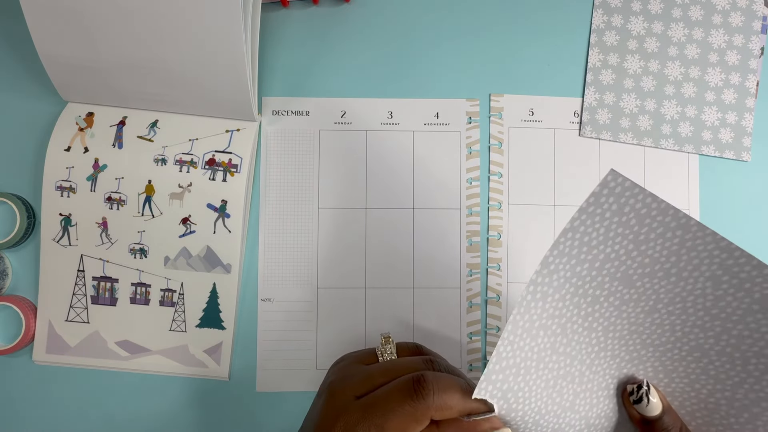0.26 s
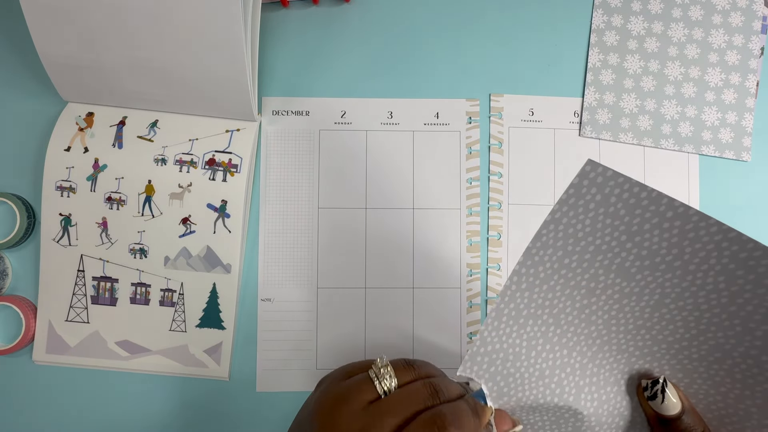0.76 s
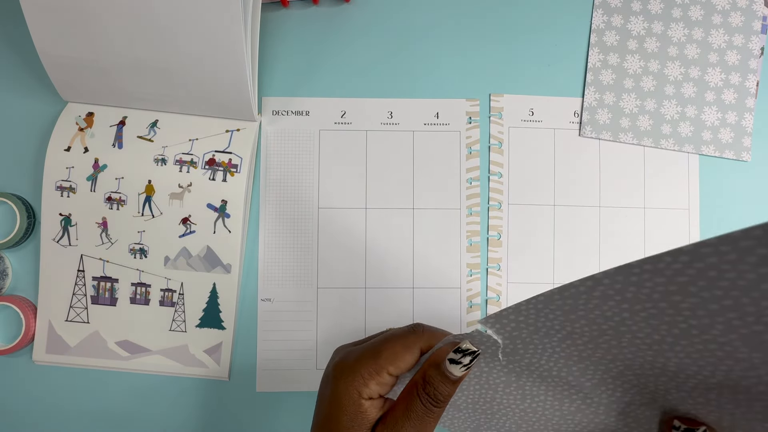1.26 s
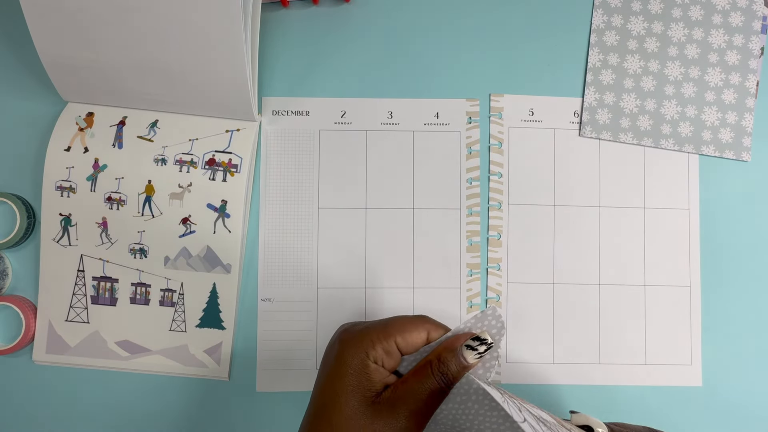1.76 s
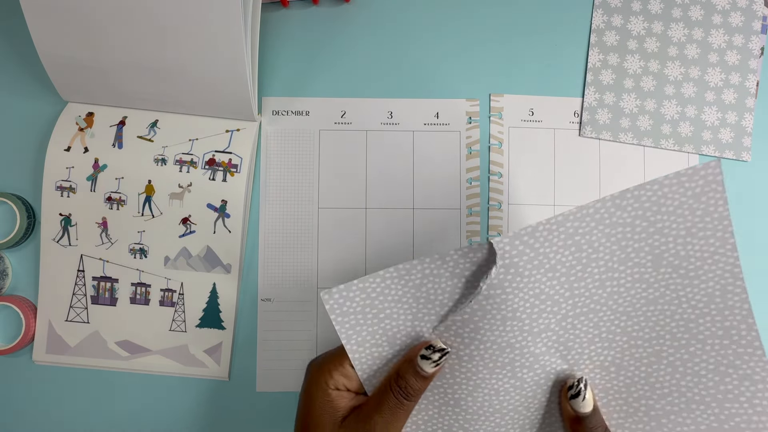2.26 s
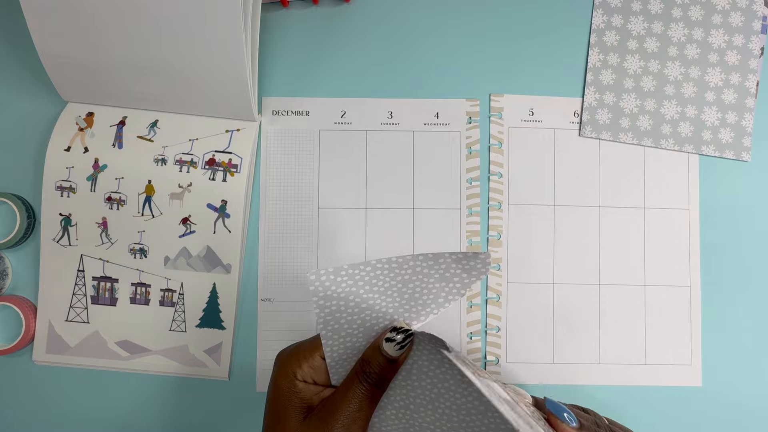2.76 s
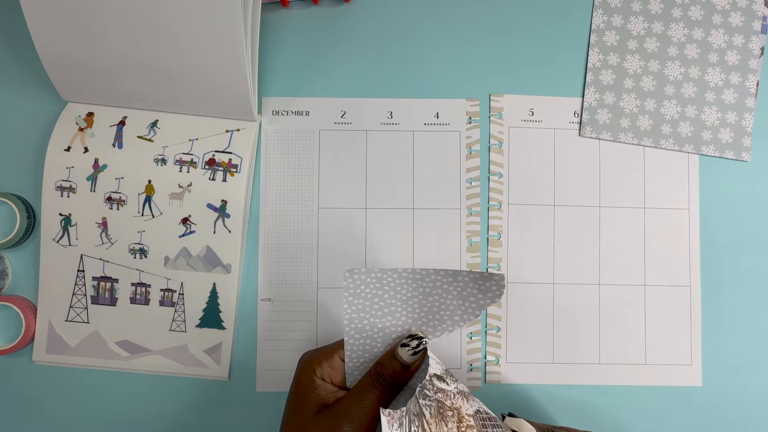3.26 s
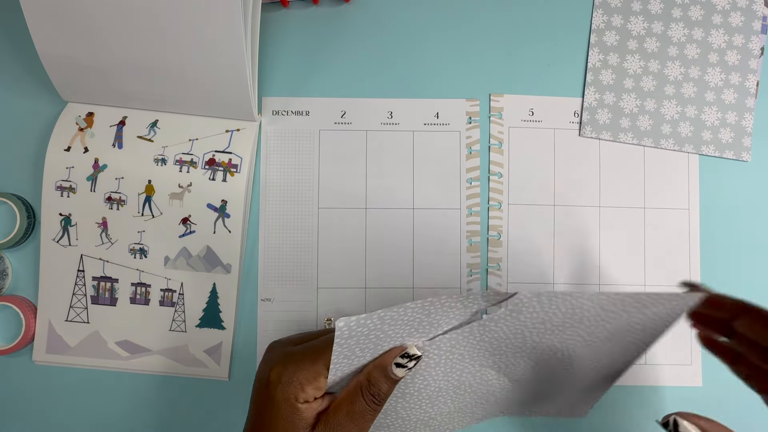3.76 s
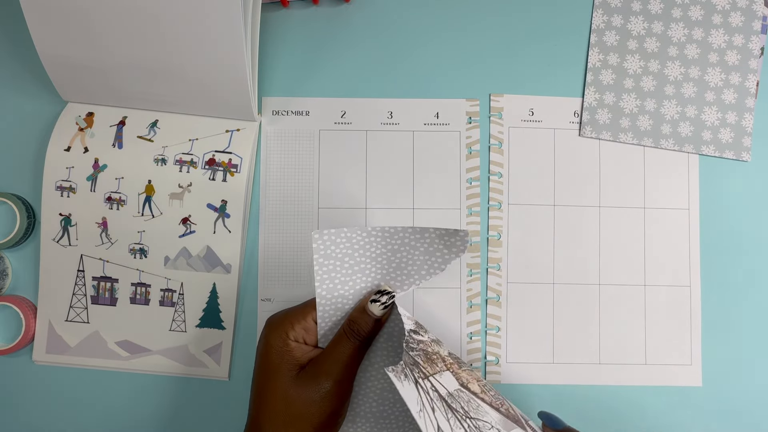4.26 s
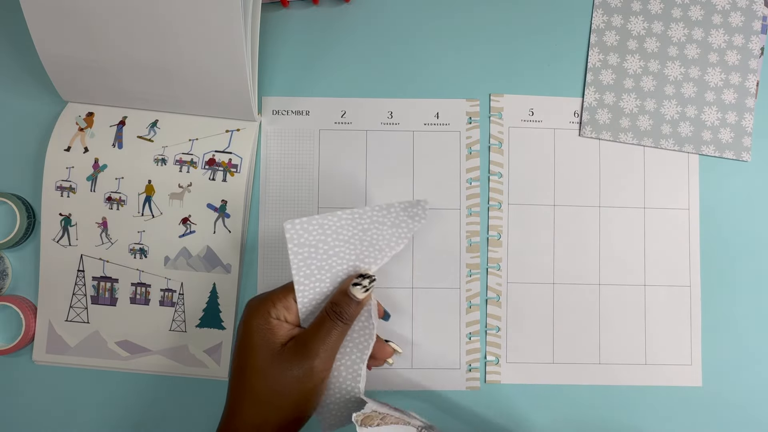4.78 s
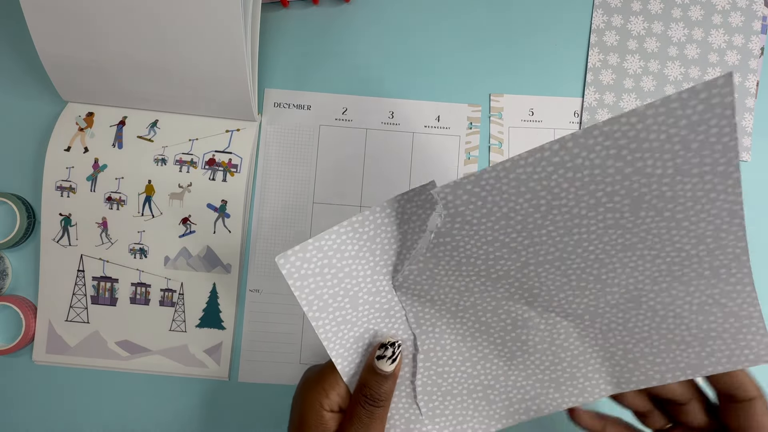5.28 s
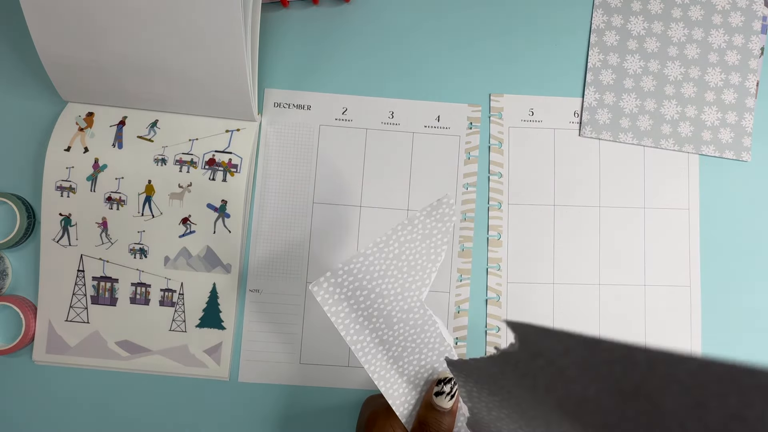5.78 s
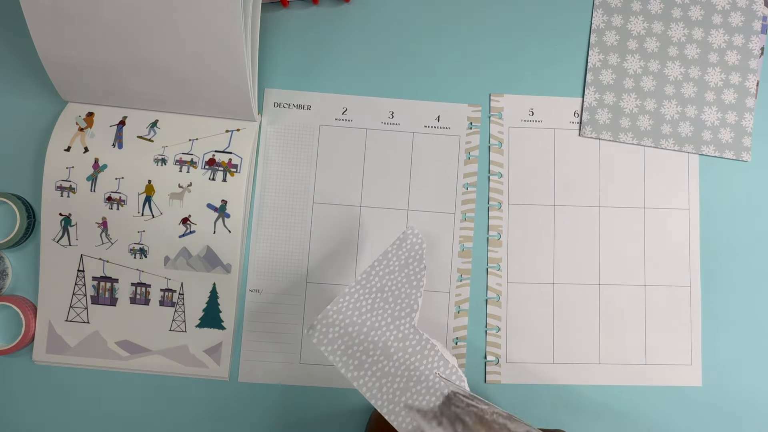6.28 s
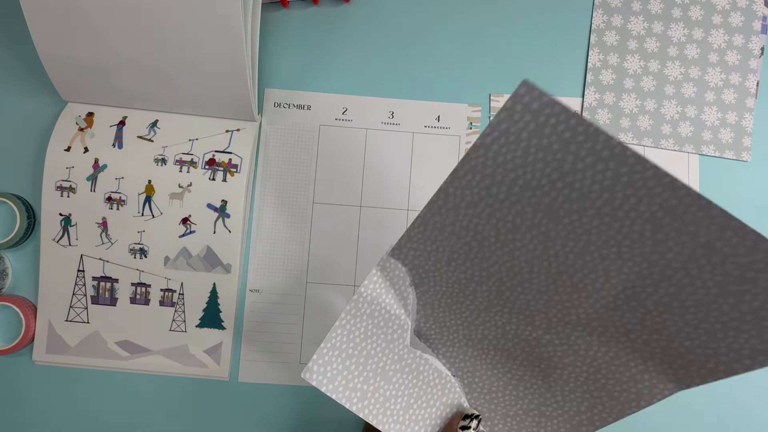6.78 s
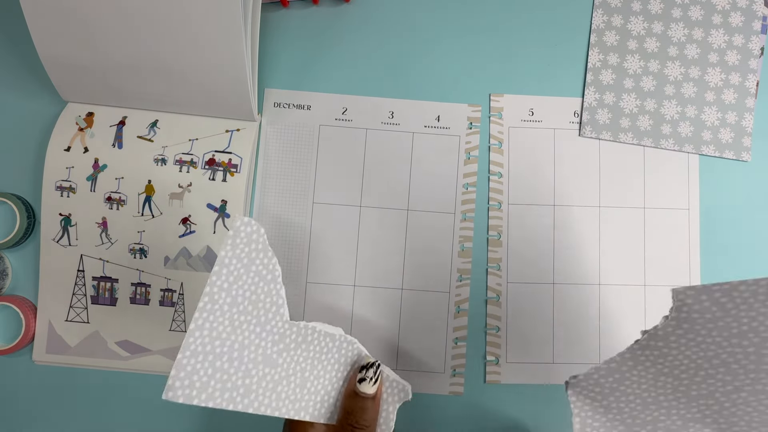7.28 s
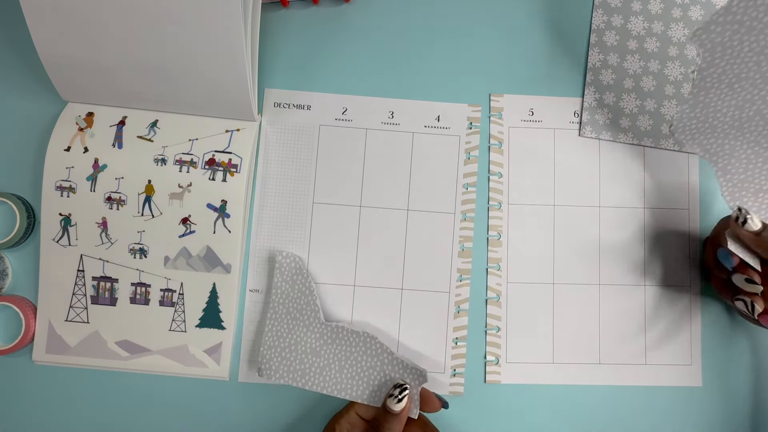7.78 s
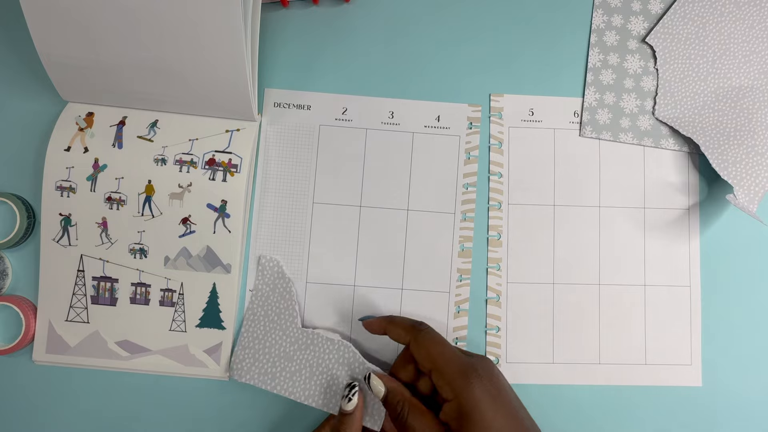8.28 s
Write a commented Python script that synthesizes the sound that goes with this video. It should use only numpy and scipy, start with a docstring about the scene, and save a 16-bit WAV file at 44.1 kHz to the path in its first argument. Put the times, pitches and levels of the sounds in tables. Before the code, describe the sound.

A stiff sheet rustles, flexes and rips in short, jerky bursts, close to a pair of microphones in a small quiet room. Lively crackling comes first, then a brief pause, a rising run of tears and hollow panel pops at their loudest, and gentler sliding and creaking. A single bright snap precedes sparse small ticks. Low puffs of moved air and a faint hum sit underneath.

```python
"""A sheet of thick paper is torn and turned by hand over a desk, under a pair of close microphones.
It starts with busy crackle, rustle and crease snaps, nearly stops after 2.6 s, and builds to the loudest
pops and tears between 3.9 and 4.8 s; softer moves and creaks follow, then one sharp snap at 7.15 s and
small ticks. Shaped noise makes fibres, rustle and pushed air; short ringing tones make pops and creaks.
A small room answers throughout, over a faint mains hum and ventilation rumble."""
import sys
import numpy as np
from scipy import signal
from scipy.fft import rfft, irfft, next_fast_len
from scipy.io import wavfile
from scipy.ndimage import uniform_filter1d, map_coordinates

SR = 44100
rng = np.random.default_rng(int(sys.argv[2]) if len(sys.argv) > 2 else 0)


def unload_audio(sound):
    """Save the sound as a 16-bit wav file, at the path given as the first command line argument."""
    columns = np.transpose(np.atleast_2d(sound))
    # keep every value between -1 and 1, then stretch to whole-number steps
    steps = np.round(np.clip(columns, -1, 1) * 32767)
    wavfile.write(sys.argv[1], SR, steps.astype(np.int16))


N = 376613
TOP_HZ = 16000  # the treble fades out above this

# colour of parting fibres: (frequency [Hz], relative level per Hz [dB])
FIBRE_COLOUR = [(710, -17), (1200, -9), (2420, -7), (2820, -7.5), (3120, -8.5), (4940, -7.5), (9030, -8.5),
                (11100, -12), (14900, -6.5), (16000, -17.5), (16500, -41.5)]


def sheet():
    """Fibres part and rub in a dense crackle while the whole sheet rustles; powers of overlapping moves add."""
    # the sheet held and turned, always a little alive:
    # (time [s], fibre hiss [dB], rustle [dB], left minus right [dB], treble sheen: bright minus dull [dB])
    handling = [(0, -59.5, -58, 1, -5), (.4, -64.5, -60.5, -1, -14.5), (.8, -58, -60.5, -1, -10),
                (1.2, -65, -68, -1, -12.5), (1.55, -53, -57, 4, -2), (2.1, -57.5, -61, -2, -6),
                (2.6, -67, -62, 2.5, -9), (2.68, -86, -78, 5.5, -17), (3.02, -78.5, -64.5, 1.5, -17.5),
                (3.5, -54, -55, 1, -5), (3.65, -67.5, -75, 2, -7), (4.25, -67, -59.5, 3.5, -8),
                (4.45, -69, -67.5, 2, -7), (5, -52, -59, 1, -7.5), (5.7, -59, -64.5, -1, 1.5),
                (6.25, -64.5, -70, 1.5, -10.5), (6.7, -58, -69, 1, 1), (6.95, -64.5, -82, -0.5, -7),
                (7.6, -66, -72.5, 1.5, -1), (8.1, -75.5, -80, 4, -4.5), (8.54, -62.5, -80, 5, 1)]
    # rips and slides: (start [s], length [s], fibre hiss [dB], rustle [dB], treble sheen [dB])
    strokes = [(0.074, 0.1, -61, -47.5, 8), (0.189, 0.071, -56.5, -51.5, -23), (0.251, 0.071, -51, -71, 0),
               (0.465, 0.071, -51, -67, 10), (0.59, 0.089, -48, -61, -5), (0.834, 0.12, -50, -79, 3),
               (1.01, 0.14, -61, -85, 8), (1.243, 0.067, -48.5, -49.5, -2), (1.597, 0.12, -45.5, -55, 14),
               (1.778, 0.08, -40, -36, -17), (1.93, 0.07, -44, -46, -7), (2.186, 0.074, -47, -44.5, -3),
               (2.281, 0.13, -50, -70, 5.5), (2.554, 0.067, -57.5, -55, -12),
               (2.859, 0.064, -63.5, -60.5, -5), (3.021, 0.14, -51.5, -49, -9.5),
               (3.18, 0.23, -50.5, -50, -7), (3.282, 0.13, -41, -58, 1), (3.481, 0.11, -52, -79, 5),
               (3.687, 0.096, -51, -53, -9), (3.874, 0.17, -60.5, -59, -25), (4.088, 0.041, -66, -52, -21),
               (4.19, 0.13, -60.5, -78, -1), (4.345, 0.022, -57, -77, 10), (4.457, 0.082, -35, -39, -9),
               (4.692, 0.06, -34.5, -43, -2), (4.734, 0.059, -21.5, -35, -4), (5.02, 0.2, -56.5, -59.5, 15),
               (5.277, 0.18, -59, -58.5, 3), (5.466, 0.12, -52, -63, 3), (5.774, 0.12, -42, -52, 0),
               (5.993, 0.077, -48, -57, -2.5), (6.096, 0.077, -52, -70, 4), (6.258, 0.044, -46.5, -69, 0),
               (6.312, 0.031, -61, -46, -13.5), (6.466, 0.087, -63.5, -78, 10),
               (6.615, 0.11, -51.5, -54, 1.5), (6.803, 0.048, -69, -59, -9), (6.963, 0.12, -48.5, -82, 8),
               (7.118, 0.03, -37, -63, 22), (7.318, 0.079, -52.5, -75, 5.5), (7.388, 0.085, -51, -70.5, 8),
               (7.483, 0.076, -57.5, -65.5, 15), (7.7, 0.17, -63.5, -79.5, 3),
               (7.967, 0.046, -59.5, -62.5, 3.5), (8.125, 0.073, -62, -69.5, 6),
               (8.267, .08, -62.5, -70.5, 4.5), (8.382, 0.085, -64.5, -79, 2.5)]
    # colour of the rustle: (frequency [Hz], relative level per Hz [dB])
    rustle_colour = [(120, -47), (200, 0), (420, 0), (491, 5), (574, -4.5), (647, 3), (1690, -6),
                     (2820, -12.5), (3500, -31.5), (4550, -37.5), (7700, -120)]

    hiss_db, rustle_db, pan_db, sheen_db = curves(handling)
    power = np.zeros((3, N + SR))  # dull hiss, bright hiss, rustle
    power[:, :N] = amp([hiss_db - sheen_db / 2, hiss_db + sheen_db / 2, rustle_db]) ** 2
    for start_s, length_s, hiss, body, sheen in strokes:
        at, shape = gesture(start_s, length_s, attack_s=0.04, release_s=0.0097)
        level = amp([[hiss - sheen / 2], [hiss + sheen / 2], [body]])
        power[:, at] += (level * shape) ** 2
    dull, bright, body = np.sqrt(power[:, :N])

    fibres = spread(crackle(clump_db=2.5, clump_rate=40, spike_db=1.5, patchy_db=1.0), FIBRE_COLOUR)
    treble = filtered(fibres, lambda hz: 1 / (1 + (7000 / (hz + 1)) ** 4))
    fibres = dull * (fibres - treble) + bright * treble  # a smooth slide is brighter than a tear
    rustle = spread(crackle(clump_db=0.6, clump_rate=84, spike_db=1.5, patchy_db=4.5), rustle_colour)

    jerk = wobble(44)  # the tear advances in jerks
    paper = amp(0.58 * jerk) * fibres + amp(1.1 * jerk) * body * rustle
    return paper * sides(pan_db)


def crackle(clump_db, clump_rate, spike_db, patchy_db):
    """Many small breaks: noise in clumps, with random spikes and patches of random colour."""
    z = signal.stft(rng.standard_normal((2, N)), nperseg=256)[2]
    patches = uniform_filter1d(rng.standard_normal(z.shape[1:]), 4, 0)  # smooth over frequency
    patches = uniform_filter1d(patches, 5, 1)  # and over time
    pair = signal.istft(z * amp(patchy_db * unit(patches)), nperseg=256)[1][:, :N]
    spikes = np.minimum(rng.exponential(1, N // 24 + 1), 5.5)
    spikes = np.repeat(spikes, 24)[:N]  # each break lasts half a millisecond
    return pair * amp(clump_db * wobble(clump_rate) + spike_db * spikes)


def snaps():
    """A crease flips in a ragged burst: the panel pops for a few cycles, fibres crack, and the sheet knocks."""
    # crease snaps: (start [s], pop peak [dB], nominal low pop [Hz], nominal high pop [Hz],
    # high pop minus low [dB], crack [dB], knock [dB], left minus right [dB])
    creases = [(.079, -37.5, 825, 2400, -4, -49, -55, -6), (0.089, -39, 450, 2460, -19, -36, -36, 0),
               (0.12, -33, 417, 2120, -21, -41.5, -59, 1), (.164, -20, 800, 2230, -9, -28, -23, -6),
               (0.225, -32, 880, 1590, -2, -44, -39, -3), (.292, -39.5, 853, 2060, -5.5, -43, -65, -7),
               (0.39, -55, 436, 1278, -22, -72, -31, -1), (.416, -43.5, 447, 2060, -9, -68.5, -28, -1.5),
               (.476, -28, 1040, 1620, 21, -28.5, -52, 0.5), (.483, -25, 840, 2630, -9.5, -19.5, -27, -7),
               (0.607, -37, 730, 2560, -22, -30.5, -37, -3), (.622, -40, 870, 2730, -11, -34.5, -52, -2),
               (.649, -30, 926, 3050, 3, -33.5, -41, 3), (0.701, -46, 860, 2760, -4, -38.5, -40, -2),
               (.85, -32.5, 930, 1700, -9, -39.5, -37, -3), (.881, -27, 920, 2040, 6, -28.5, -24, 0),
               (1.237, -48, 480, 2230, -22, -41.5, -46, 9), (1.267, -28, 830, 1370, -26, -48, -24.5, 4.5),
               (1.299, -39, 996, 2330, -12, -41.5, -29, 2), (1.416, -24.5, 1100, 2200, -4.5, -21, -49, -1),
               (1.46, -33, 498, 1290, -12, -57.5, -40, 8), (1.506, -27.5, 745, 2350, -13, -20, -33.5, 4.5),
               (1.53, -30.5, 703, 1854, -8.5, -22, -52, 5), (1.623, -31, 770, 2680, -9, -28.5, -53, 7),
               (1.652, -37, 700, 2500, 2, -33, -57, 4), (1.696, -35, 604, 1505, -6.5, -29, -51, 9),
               (1.723, -42, 1400, 2800, 6, -36, -55, -1), (1.812, -21.5, 1110, 2540, 5, -17.5, -54, -5),
               (1.945, -28.5, 435, 2500, 1, -24.5, -33, 1), (2.079, -41, 870, 2120, -13, -43, -47, -3),
               (2.204, -35.5, 820, 2160, -4.5, -38.5, -25.5, -1),
               (2.214, -27.5, 840, 2520, -20, -46.5, -28, -3), (2.384, -30, 610, 2550, -7, -37, -31, -1),
               (2.405, -22, 910, 2170, 2, -41, -30, -7), (2.435, -30, 447, 1510, -3.5, -37.5, -30, -1),
               (2.544, -31.5, 560, 1160, -5, -64, -21, 3), (2.976, -46, 450, 1500, -4, -42, -61, 1),
               (3.037, -42, 756, 1410, -10, -29.5, -45, -0.5), (3.206, -40, 760, 2540, -11, -30, -57, -3),
               (3.322, -32.5, 620, 1800, -10, -18.5, -33, 2), (3.33, -40, 700, 3000, 0, -20, -50, -2.5),
               (3.411, -60, 500, 1610, -16, -56, -29.5, 17), (3.468, -40.5, 593, 1530, -11, -56, -37, 0),
               (3.687, -29, 790, 1720, 6, -22, -35, 1.5), (3.706, -28.5, 1113, 1243, -15, -33, -27.5, 3),
               (3.865, -38, 545, 1936, -5.5, -39, -34.5, -1),
               (3.884, -15.5, 869, 1760, -6.5, -19, -43.5, 1), (3.908, -31, 713, 1460, 0, -41, -25, 2),
               (3.937, -11.5, 910, 1760, -14, -34, -27, -1), (4.078, -7, 965, 1525, 1.5, -63, -47, 2),
               (4.098, -18, 982, 1750, 1.5, -45, -30, 6), (4.103, -45, 1000, 2400, 0, -30, -58, 1),
               (4.35, -56, 900, 2392, 0, -45, -63.5, 5), (4.428, -55.5, 900, 2410, 1, -48.5, -64, 3.5),
               (4.445, -55, 900, 2400, 0.5, -48, -62.5, -1.5), (4.462, -49, 900, 2000, 1, -34.5, -58, 2),
               (4.508, -3.5, 1100, 1720, -1.5, -20, -40.5, 3),
               (4.696, -39, 1129, 2240, -5, -31.5, -54, 4.5), (4.706, -30, 1300, 2200, 2, -41, -55, 5),
               (4.714, -16, 1016, 1476, -5.5, -29, -48, 1.5), (4.753, -3.5, 1083, 1620, 6.5, -10, -38.5, 4),
               (4.758, -6.5, 687, 1673, -1.5, -12.5, -44, -1), (4.963, -34, 716, 1650, -7, -50, -31.5, 0),
               (5.041, -39.5, 705, 1850, -15, -68, -33, 5), (5.19, -28.5, 1090, 1810, -1.5, -32.5, -35, -3),
               (5.293, -41, 800, 2500, -14, -36, -56, -3), (5.305, -35, 406, 1780, -16, -45, -30.5, 0),
               (5.376, -48, 800, 1300, -4, -55, -45, -2), (5.412, -46, 700, 1100, -4, -46, -45, -1),
               (5.422, -41, 850, 1300, -12, -55, -53, -1), (5.392, -41, 795, 2780, -9, -39, -35, 0),
               (5.262, -62, 420, 1500, -12, -64, -36, 2), (5.638, -41, 450, 2420, -19, -55, -45, 2),
               (5.757, -51, 1050, 1760, -8, -34, -59, -6), (5.903, -33.5, 596, 1470, -28, -41, -59, -6),
               (6.317, -29, 1700, 3400, -9, -33.5, -27, -1.5), (6.682, -31, 1050, 1420, -10, -38.5, -37, 1),
               (6.779, -41, 1130, 1890, -9, -41, -61.5, -3),
               (6.994, -49.5, 1190, 2706, -19.5, -35.5, -68, -2.5),
               (7.141, -52, 1120, 2180, -8.5, -31.5, -59.5, -5),
               (7.154, -17, 1300, 2560, 6, -20.5, -67.5, 1.5), (7.164, -31.5, 1300, 3100, -4, -38, -67, 1),
               (7.94, -59.5, 643, 2470, 12, -49, -61, -3.5), (7.975, -69, 1104, 2340, -15, -38, -58, -2.5),
               (8.131, -44.5, 1090, 2100, 3.5, -40.5, -43.5, 1),
               (8.37, -43.5, 1090, 2510, 4.5, -42.5, -48, 1)]
    soft_db = -30  # pops above this flip faster and start harder
    flip_s, crack_hz = 0.0018, 3880  # flip time and crack pitch of a soft crease, varied a little each time
    crack_t60_s = 0.035  # crack decay, the same for all

    out, t = np.zeros((2, N + SR)), np.arange(SR // 5) / SR
    fall = amp(-60 * t / crack_t60_s)
    for start_s, db, low_hz, high_hz, high_db, crack_db, knock_db, pan_db in creases:
        low_shift, high_shift, knock_shift, vary = rng.standard_normal((4, 2))
        harder_db = max(db - soft_db, 0)
        # flip time loses 0.08 dB for each dB above a soft snap
        u = t / (flip_s * amp(-0.08 * harder_db) * np.exp(0.13 * vary[0]))
        flip = crease_flip(u, fall, harder_db)
        low = rung(mode(t, low_hz, 7.2, low_shift), flip)
        high = rung(mode(t, high_hz, 8.6, high_shift), flip)
        pop = slackened(low + amp(high_db) * high, t)
        pop /= np.abs(pop).max()
        crack = fibre_crack(t, u, fall, crack_hz * np.exp(0.16 * vary[1]))
        knock = mode(t, 240 * np.exp(0.2 * knock_shift[0]), 5.0, knock_shift)
        sound = amp(db) * pop + amp(crack_db) * crack + amp(knock_db) * knock
        at = round(start_s * SR)
        out[:, at:at + len(t)] += sides(pan_db)[:, None] * sound
    return out[:, :N]


def crease_flip(u, fall, harder_db):
    """The buckle runs along the crease for a few milliseconds, then the panel shivers as fibres break."""
    buckle = u * np.exp(1 - u)
    shiver = 0.27 * (1 - np.exp(-u)) * fall
    flip = (buckle + shiver) * rng.standard_normal(len(u))
    # one sudden kick against the ragged rest, 0.08 dB stronger for each dB above a soft snap
    flip[np.argmax(u > 0.5)] += 0.63 * amp(0.08 * harder_db) * np.linalg.norm(flip)
    return flip


def mode(t, hz, cycles, shift):
    """One ringing tone that falls 60 dB in the given cycles, with its own phase on each side."""
    swell = 1 - np.exp(-2.5 * t * hz)
    return amp(-60 * t * hz / cycles) * swell * np.sin(2 * np.pi * hz * t + 0.21 * shift[:, None])


def rung(ring, flip):
    """A panel rung by the flip; a loose sheet radiates little below 382 Hz."""
    thin = signal.butter(3, 382, "high", fs=SR, output="sos")
    struck = signal.fftconvolve(ring, flip[None], axes=1)[:, :ring.shape[1]]
    return unit(signal.sosfilt(thin, struck))


def slackened(pop, t):
    """The panel loses tension, so its pitch falls from 11% above nominal to 11% below."""
    sag, sag_s = 0.22, 0.0054  # whole fall as a share of the pitch, and its time constant
    place = np.cumsum(1 + sag * (np.exp(-t / sag_s) - 0.5))
    return np.array([np.interp(place, np.arange(len(t)), side) for side in pop])


def fibre_crack(t, u, fall, crack_hz):
    """Fibres crack in ragged noise: the first let go at once, the rest follow the buckle."""
    snick, snick_s = 0.55, 0.0017  # first fibres: size against the crack, time to peak
    common, apart = rng.standard_normal(len(t)), rng.standard_normal((2, len(t)))

    def colour(hz):
        bump = 1 + 1.3 / (1 + ((hz - crack_hz) / 900) ** 2)
        return amp(along(FIBRE_COLOUR, hz)) * tinted(hz) * bump

    ragged = amp(1.6 * unit(uniform_filter1d(rng.standard_normal(len(t)), 90)))
    rise = 1 - np.exp(-(u / 4.8) ** 2)
    first = snick * t / snick_s * np.exp(1 - t / snick_s)
    return shaped(filtered(common + 2.0 * apart, colour) * ragged, rise * fall + first)


def bursts():
    """The tear runs on in a swell of breaks; the taut edge rings, its pitch sliding with its free length."""
    # tear bursts and creaks: (peak time [s], rise [s], fall [s], edge ring [dB], ring from [Hz],
    # ring to [Hz], crack [dB], left minus right [dB])
    tears = [(0.125, 0.045, 0.026, -46.5, 497, 908, -60, -6), (.405, 0.014, 0.022, -51, 450, 350, -78, -1),
             (1.106, 0.019, .02, -53.5, 3505, 3610, -60, 0), (1.668, 0.007, 0.015, -42, 660, 607, -33.5, 2),
             (1.685, .012, .014, -36.5, 2300, 1324, -32.5, -4),
             (1.734, 0.016, 0.012, -40, 1386, 910, -30, -1.5),
             (1.773, 0.0053, 0.0089, -38.5, 694, 610, -32.5, 5),
             (1.789, 0.0052, 0.0092, -32, 2934, 2926, -23, 0.5),
             (1.793, 0.006, .008, -38, 1098, 898, -43, 0), (1.733, 0.011, 0.0067, -39, 4230, 3760, -52, 1),
             (1.817, 0.0036, 0.0054, -26, 2612, 2327, -25, -10.5),
             (1.826, 0.0045, 0.0083, -41, 1983, 708, -27.5, 10),
             (1.85, 0.005, .005, -35, 2900, 2800, -33, -1), (1.856, 0.004, .008, -36, 1154, 803, -45, 0.5),
             (2.33, 0.018, 0.0098, -47.5, 811, 703, -53, -6),
             (2.332, 0.013, 0.0091, -49, 2193, 2210, -64, -7), (3.09, 0.016, .02, -49.5, 595, 655, -59, -2),
             (3.15, .01, .01, -54, 1547, 1550, -63, -6), (3.258, 0.0088, 0.013, -44, 1112, 1135, -60, 8),
             (3.303, 0.0099, 0.0058, -27, 1003, 1250, -30.5, 2.5),
             (3.317, 0.0077, 0.0087, -33, 1290, 1313, -52, 5),
             (3.372, 0.019, 0.019, -37, 643, 1460, -43, 1), (3.411, 0.0065, 0.01, -43, 795, 247, -58, 6.5),
             (3.93, 0.0072, 0.0044, -36, 908, 897, -52, -5), (3.945, .003, 0.0029, -22, 899, 850, -49, -4),
             (3.995, 0.016, 0.0074, -32.5, 992, 907, -35.5, 1),
             (4.084, 0.0029, 0.0074, -24.5, 965, 862, -60, 7),
             (4.107, 0.0044, 0.0081, -35, 4720, 4490, -49, 8.5),
             (4.484, 0.014, 0.011, -35.5, 1496, 790, -33.5, 3),
             (4.5, 0.005, .006, -27, 1614, 1363, -29, -3), (4.519, .005, 0.011, -27, 1905, 1220, -35, 4),
             (4.518, .004, 0.0076, -28.5, 797, 690, -42, 0), (4.55, 0.01, 0.019, -38, 1486, 1605, -41, 5),
             (4.73, .012, 0.0053, -29.5, 1512, 1295, -35.5, -1),
             (4.75, .012, 0.0063, -16, 1792, 1848, -28, -4),
             (4.783, 0.015, 0.011, -28.5, 5910, 6310, -39.5, 0),
             (4.772, 0.0083, 0.026, -25.5, 1700, 1530, -28, 2),
             (4.81, 0.011, 0.017, -35, 1588, 1686, -31, 7), (5, 0.011, 0.016, -55, 1550, 1516, -46, 4),
             (5.1, 0.011, 0.012, -51, 1214, 495, -68, 3), (5.165, 0.011, 0.015, -53, 812, 1016, -53, 0),
             (5.168, 0.015, 0.019, -51, 2000, 2100, -65, 0),
             (5.486, 0.014, 0.021, -49, 795, 1083, -48.5, -3),
             (5.642, 0.0069, 0.0063, -48.5, 843, 813, -54, 2),
             (5.769, 0.0077, 0.028, -54.5, 985, 1043, -48, 6),
             (5.845, 0.024, .03, -47.5, 1050, 1047, -60, -4), (5.515, .02, .03, -56, 2304, 2350, -65, -2),
             (5.93, .01, 0.017, -53, 649, 600, -70, 1), (5.985, .02, 0.026, -51, 596, 398, -76, -4),
             (6.013, 0.0048, .006, -53, 1610, 1530, -51, -6),
             (6.058, .012, 0.015, -50.5, 953, 994, -52.5, 1),
             (6.326, .005, 0.014, -37.5, 1150, 495, -53, -2), (6.335, .01, 0.031, -43, 262, 218, -71, -2),
             (6.384, .006, 0.012, -49.5, 1047, 1015, -63.5, 0),
             (6.8, 0.016, 0.01, -53, 1095, 1210, -57.5, -2),
             (7.029, 0.021, 0.084, -57, 1150, 1142, -63.5, 0.5),
             (7.04, 0.038, 0.052, -58.5, 1723, 1716, -69, 0), (7.145, 0.02, 0.0075, -51, 895, 1190, -43, 6),
             (7.18, .008, 0.038, -60, 3600, 3080, -46.5, 5),
             (7.552, 0.011, 0.011, -63, 817, 802, -66.5, -4),
             (7.559, 0.017, 0.027, -53.5, 423.5, 297, -75, -4)]

    out = np.zeros((2, N + SR))
    for peak_s, rise_s, fall_s, db, from_hz, to_hz, crack_db, pan_db in tears:
        t = np.arange(SR // 5) / SR - 2 * rise_s  # zero at the peak
        shape = np.where(t < 0, np.exp(-2 * (t / rise_s) ** 2), np.exp(-np.abs(t) / fall_s))
        sizes = np.minimum(rng.exponential(1, SR // 100), 4)
        breaks = amp(3.0 * np.repeat(sizes, 26)[:len(t)])
        noise = rng.standard_normal((6, len(t)))
        common, apart = noise[0] + 1j * noise[1], noise[2:4] + 1j * noise[4:]

        hz = from_hz + (to_hz - from_hz) * np.clip((t + rise_s) / (rise_s + 1.5 * fall_s), 0, 1)
        hz = hz * (1 + 0.045 * unit(uniform_filter1d(noise[5], 300)))  # the edge is uneven
        ring = amp(-60 * (t - t[0]) * hz.mean() / 9.5)  # falls 60 dB in 9.5 cycles
        drive = (common + 1.2 * apart) * breaks
        swell = signal.fftconvolve(drive, ring[None], axes=1)[:, :len(t)]
        edge = (swell * np.exp(2j * np.pi * np.cumsum(hz) / SR)).real  # moved up to the edge's pitch

        crack = filtered((common.imag + apart.real) * breaks,
                         lambda f: amp(along(FIBRE_COLOUR, f)) * tinted(f))
        sound = amp(db) * shaped(edge, shape) + amp(crack_db) * shaped(crack, shape)
        at = round((peak_s - 2 * rise_s) * SR)
        out[:, at:at + len(t)] += sides(pan_db)[:, None] * sound
    return out[:, :N]


def air_push():
    """The held and swung sheet pushes air at the microphones, a low uneven noise."""
    # slow drift of air from the held sheet: (time [s], level [dB])
    drift = [(0, -55), (1.5, -58), (2.6, -58), (2.7, -62.5), (3, -54.5), (4.3, -57), (5.7, -57.5),
             (6.8, -61.5), (6.95, -80.5), (7.4, -61), (7.7, -60), (8.54, -59.5)]
    # swings of the sheet: (start [s], length [s], air push [dB])
    swings = [(0.086, 0.099, -43.5), (0.45, 0.042, -52), (0.593, .05, -50.5), (0.86, 0.035, -49),
              (1.797, 0.031, -52.5), (1.946, .04, -48), (2.192, 0.07, -43), (2.373, 0.058, -38.5),
              (3.394, 0.02, -42.5), (3.463, 0.039, -40), (3.68, 0.046, -47), (3.854, 0.13, -40.5),
              (4.06, 0.032, -43.5), (4.496, 0.025, -46.5), (4.728, 0.054, -38), (4.96, 0.017, -42.5),
              (5.2, 0.13, -46), (5.893, 0.17, -48.5), (6.303, 0.067, -40.5), (6.43, 0.034, -41.5),
              (7.512, 0.086, -55.5)]
    # colour of the pushed air: (frequency [Hz], relative level per Hz [dB])
    push_colour = [(20, -38), (45, -2), (65, 3.5), (120, -2.5), (220, -12.5), (400, -43.5)]

    power = np.zeros(N + SR)
    power[:N] = amp(curves(drift)[0]) ** 2
    for start_s, length_s, db in swings:
        at, shape = gesture(start_s, length_s, attack_s=0.035, release_s=0.041)
        power[at] += (amp(db) * shape) ** 2
    gusts = rng.standard_normal((2, N)) * amp(3.1 * wobble(13))
    return np.sqrt(power[:N]) * spread(gusts, push_colour)


def placed(x):
    """The nearer microphone hears the sheet first."""
    # where the sheet is held: (time [s], lead of the left microphone [microseconds])
    lead = [(0, -4), (1.2, 39), (1.75, 66), (2.25, 11), (2.75, 107.5), (3.25, 128), (3.75, 43), (4.25, 44),
            (4.75, 114), (5.25, 27), (5.75, 125), (6.25, 113), (7.2, 27.5), (7.75, 107), (8.54, 126)]
    hz, t, z = signal.stft(x, SR, nperseg=512)
    lead_s = np.interp(t, *np.transpose(lead)) / 1e6
    each_way = np.array([1, -1])[:, None, None]  # half the lead on each side
    turned = z * np.exp(1j * np.pi * hz[:, None] * lead_s * each_way)
    return signal.istft(turned, SR, nperseg=512)[1][:, :N]


def room(x):
    """Walls answer 3 ms later; the sheet keeps moving, so each quarter second meets a new tail."""
    # how long the room rings: (frequency [Hz], time to fall 60 dB [s])
    walls = [(200, 0.25), (600, 0.15), (1500, 0.19), (4000, 0.2), (10000, 0.13)]
    out, step = np.zeros((2, N + 2 * SR)), SR // 4
    for start in range(0, N, step):
        hz, t, z = signal.stft(rng.standard_normal((2, SR // 2)), SR, nperseg=256)
        fading = z * amp(-60 * t / along(walls, hz)[:, None])
        tail = signal.istft(fading, SR, nperseg=256)[1]
        tail = tail / np.linalg.norm(tail[0])
        wet = signal.fftconvolve(x[None, start:start + step], tail, axes=1)
        out[:, start + 130:start + 130 + wet.shape[1]] += wet
    return out[:, :N]


def background():
    """Ventilation noise and an unsteady mains hum, which reaches the two microphones out of step."""
    # hum tones: (frequency [Hz], typical peak level [dB])
    hum_tones = [(59.2, -68), (118.4, -74), (242.2, -77)]
    # colour of the ventilation: (frequency [Hz], relative level per Hz [dB])
    vent_colour = [(15, -73), (25, -14.5), (47, -2.5), (85, -60), (118, 5), (208, -22.5), (259, 1.5),
                   (321, -22.5), (831, -43.5), (952, -40), (1030, -46.5), (1280, -43.5), (16500, -68)]
    t, step = np.arange(N) / SR, np.array([[0.6], [-0.6]])  # step in radians
    hum = 0
    for hz, db in hum_tones:
        phase = 2 * np.pi * hz * t + 0.48 * wobble(4.0) + step
        hum = hum + amp(db + 2.3 * wobble(21)) * np.sin(phase)
    rumble = spread(rng.standard_normal((2, N)), vent_colour)
    return hum + amp(-63.5 + 3.9 * wobble(57)) * rumble


def spread(pair, spectrum):
    """Two signals coloured and mixed to a stereo pair of rms 1, more alike at some pitches than others."""
    # likeness of the two sides: (frequency [Hz], left-right likeness [0 to 1])
    alike = [(50, 0.57), (250, 0.38), (700, 0.09), (2500, 0.14), (8000, 0.29), (14000, 0.27)]

    def response(hz):
        turn = np.arccos(np.clip(along(alike, hz), -1, 1)) / 2
        return amp(along(spectrum, hz)) * np.array([np.cos(turn), np.sin(turn)])

    mid, side = filtered(pair, response)
    return unit(np.array([mid + side, mid - side]))


def gesture(start_s, length_s, attack_s, release_s):
    """Where a move lies in time, and its shape: rise, hold, die away."""
    t = np.arange(SR) / SR
    shape = (1 - np.exp(-t / attack_s)) * np.exp(-np.clip(t - length_s, 0, None) / release_s)
    at = round(start_s * SR)
    return slice(at, at + SR), shape


def curves(rows):
    """One value per sample for each column after the time."""
    s, *cols = np.transpose(rows)
    return [np.interp(np.arange(N) / SR, s, c) for c in cols]


def wobble(rate):
    """A smooth random curve with rate random knots a second."""
    knots = rng.standard_normal(int(N * rate / SR) + 4)
    return map_coordinates(knots, [np.arange(N) * rate / SR])


def tinted(hz):
    """Gain of a random uneven colour: 18 knots spread evenly up to the top frequency."""
    knots = rng.standard_normal(18)
    return amp(3.5 * np.interp(hz, np.linspace(0, TOP_HZ, len(knots)), knots))


def shaped(x, shape):
    return unit(x * shape) * np.sqrt(np.mean(shape ** 2))


def filtered(x, response):
    """x with each frequency multiplied by a response, which may also turn its phase."""
    m = next_fast_len(x.shape[-1] + 8192)
    return irfft(rfft(x, m) * response(np.fft.rfftfreq(m, 1 / SR)), m)[..., :x.shape[-1]]


def along(points, hz):
    """Values read between (Hz, value) points on a log frequency axis."""
    f, v = np.transpose(points)
    return np.interp(np.log(hz + 1), np.log(f + 1), v)


def sides(pan_db):
    """Left and right gains for a left-minus-right difference in dB."""
    return amp(np.array([pan_db / 2, -pan_db / 2]))


def amp(db):
    """Gain of a level in dB."""
    return 10 ** (np.asarray(db) / 20)


def unit(x):
    """x at rms 1."""
    return x / np.sqrt(np.mean(x ** 2) + 1e-20)


def scene():
    """Paper heard directly, mostly a little earlier on the left, then off the walls, over the low sounds."""
    paper = sheet() + snaps() + bursts()
    near = placed(paper)
    far = room(amp(-4.5) * paper.mean(0))

    def out_of_step(hz):
        # a pressure gradient: each side turns by up to 0.4 radian, less below 45 Hz
        turn = (hz > 0) / (1 + (45 / (hz + 1)) ** 2)
        return np.exp(0.4j * np.array([[1], [-1]]) * turn)

    low = filtered(air_push() + background(), out_of_step)
    return near + far + low


def record(dry):
    """The recorder rounds off the highest peaks and fades out the treble above its band limit."""
    soft = dry / (1 + np.abs(dry / 0.9) ** 4) ** (1 / 4)

    def band(hz):
        slope = amp(-25 * np.clip((hz - TOP_HZ) / 300, 0, 1))
        return slope * (hz < TOP_HZ + 900)

    return filtered(soft, band)


dry = scene()
out = record(dry)
unload_audio(out)
```